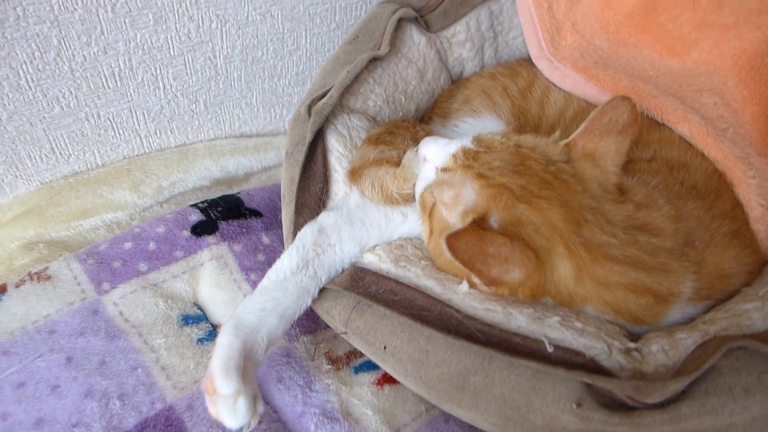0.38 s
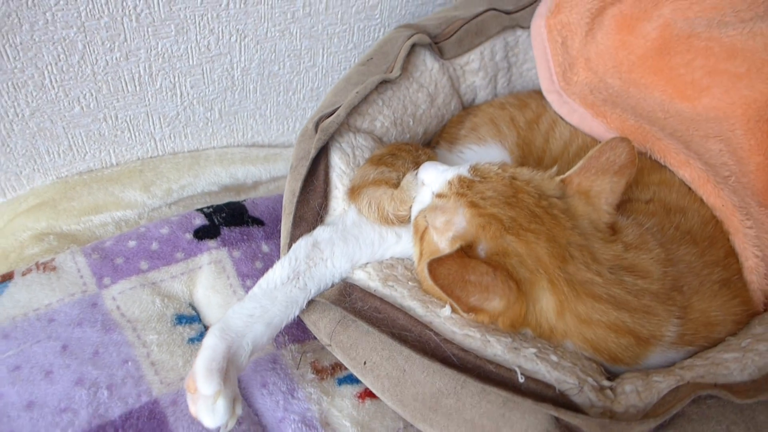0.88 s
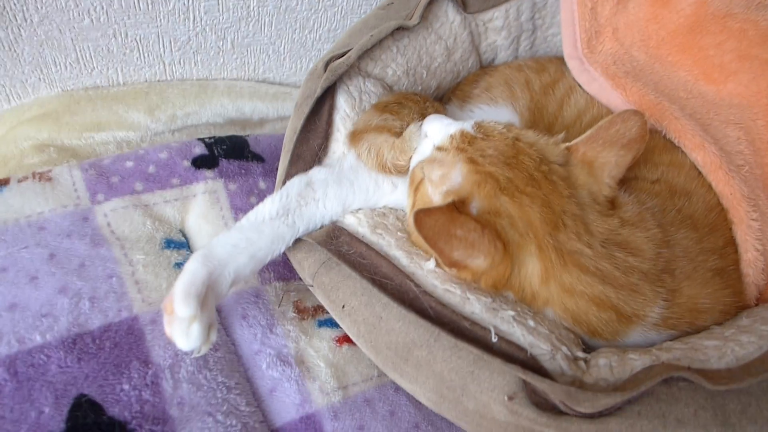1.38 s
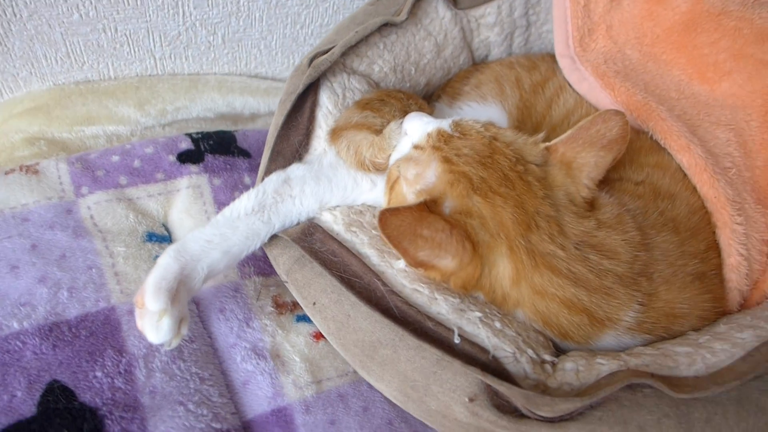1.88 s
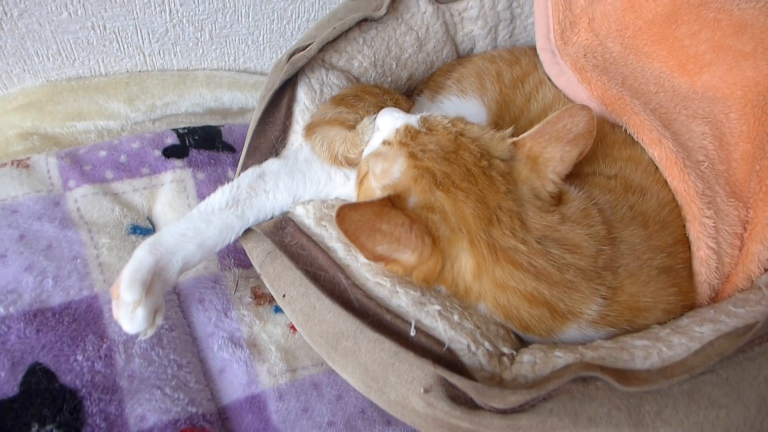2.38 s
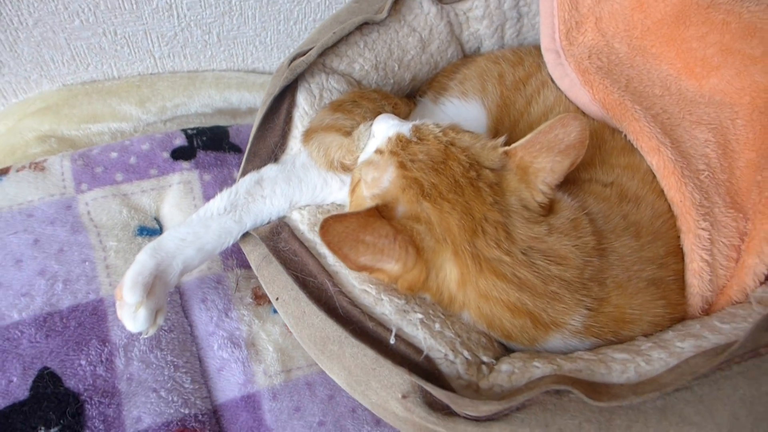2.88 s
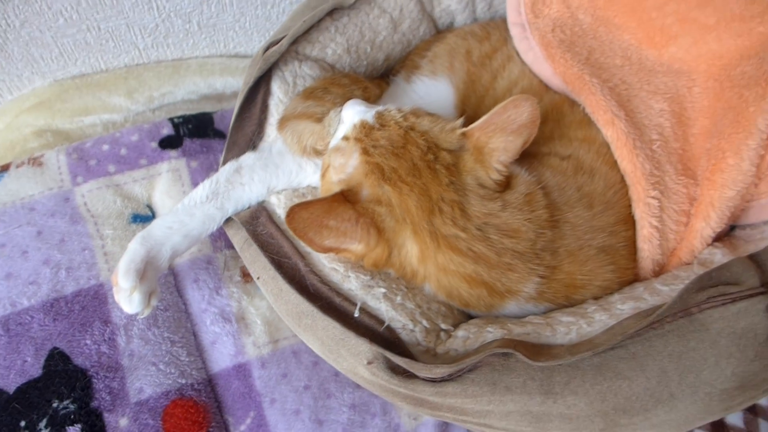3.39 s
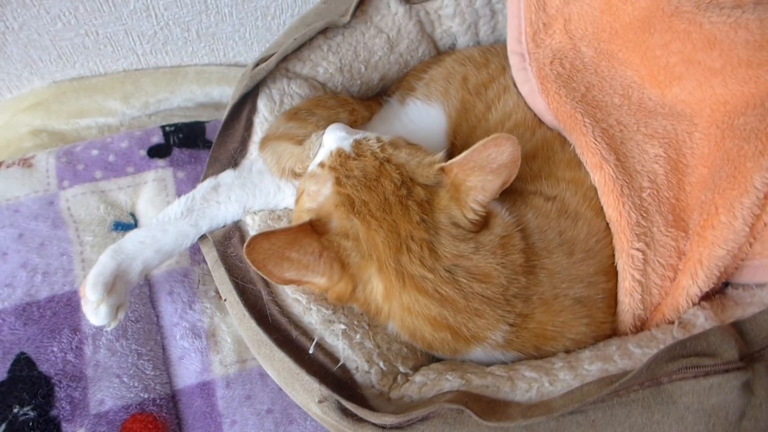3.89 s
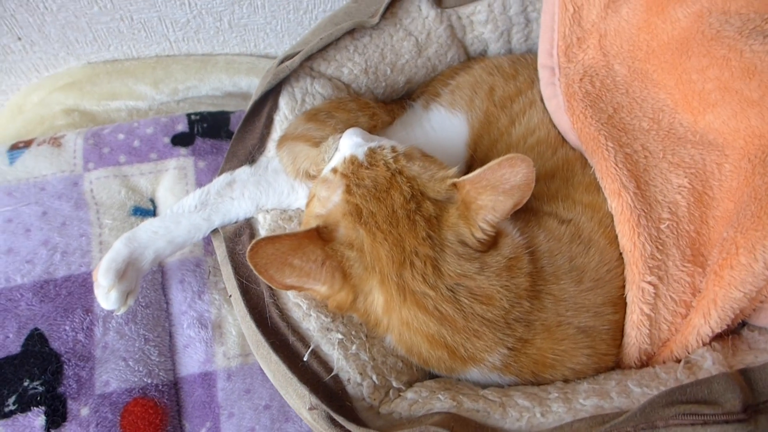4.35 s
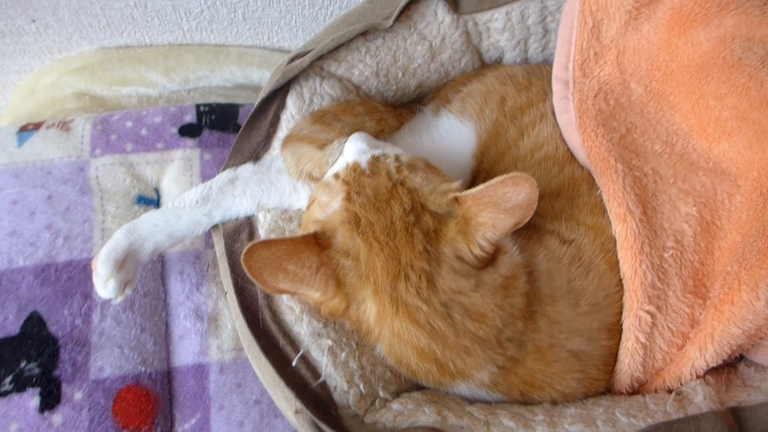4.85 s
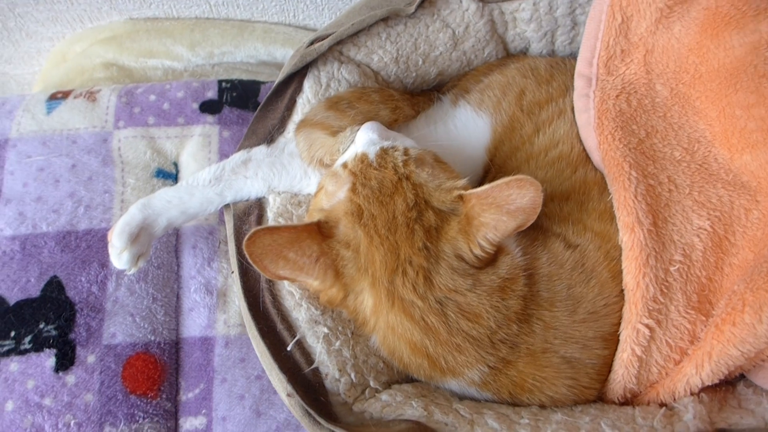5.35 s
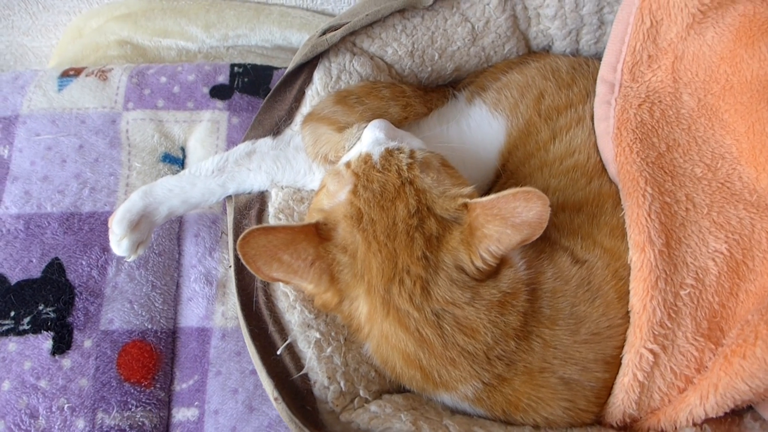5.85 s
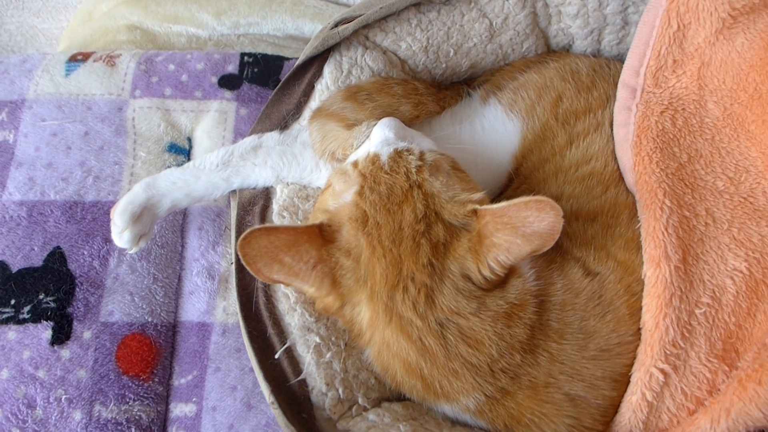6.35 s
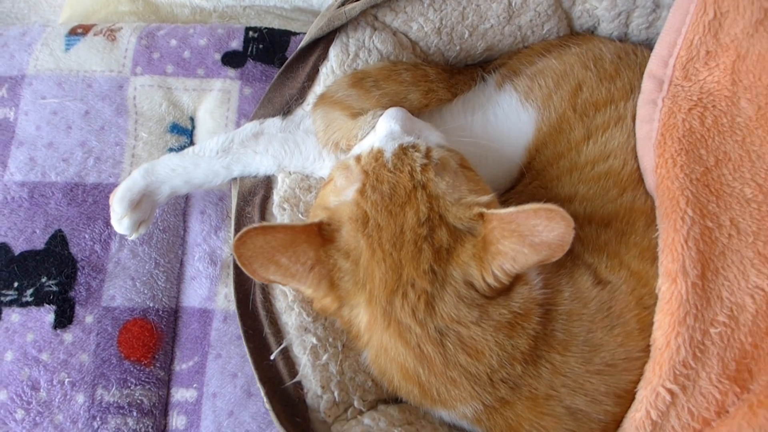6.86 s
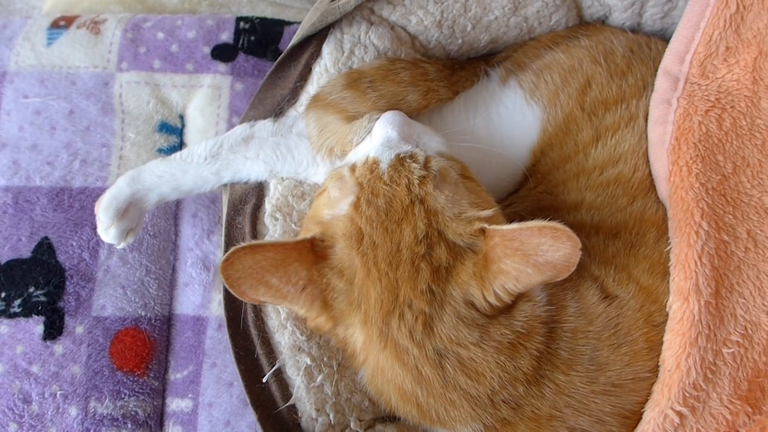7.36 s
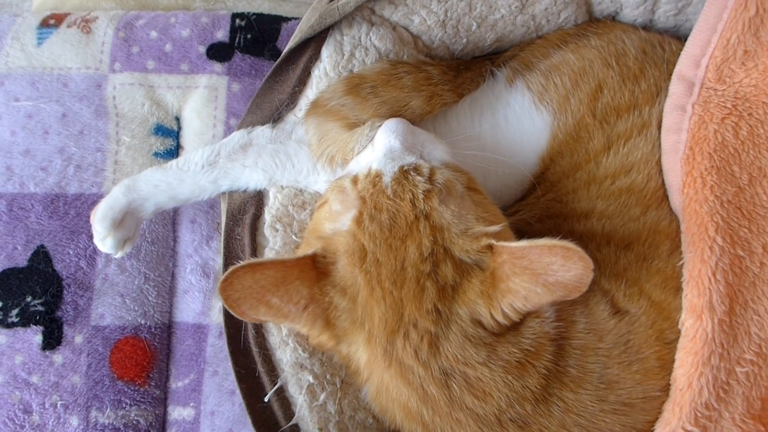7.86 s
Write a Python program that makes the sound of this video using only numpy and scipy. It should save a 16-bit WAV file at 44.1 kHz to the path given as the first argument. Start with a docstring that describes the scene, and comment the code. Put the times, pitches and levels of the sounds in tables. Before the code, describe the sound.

Close stereo pickup from a camera held near a sleeping cat indoors. A coarse, fluttering low burr keeps breaking off and resuming, left-heavy, while dry little mechanical ticks patter rapidly. Skin slides, creaks and light plastic clicks occupy the first seconds; a soft thump falls at 1.3 and two loud snaps near 2.5. Then handling mostly ceases, leaving burr, fine ticking, low hum, room rumble and soft hiss.

```python
"""Dozing cat and a hand-held camera

A cat dozes in its bed under a hand-held camera in a quiet room. Uneven jolts through resonances make a rough purring
burr that starts and stops, its throb mostly at the left microphone port. The lens drive ticks at the picture rate and
whispers between; fingers rub and creak (shaped noise), click (decaying modes) and thump the plastic case.
A wavering hum (gliding sine), faint tones, room rumble and hiss lie underneath."""
import sys
import numpy as np
from scipy import signal
from scipy.fft import rfft, irfft, next_fast_len
from scipy.io import wavfile
from scipy.ndimage import uniform_filter1d, map_coordinates

SR = 44100
rng = np.random.default_rng(int(sys.argv[2]) if len(sys.argv) > 2 else 0)


def magnitude_from_level(level_db):
    """Linear magnitude for a level in decibels (20 dB per decade)."""
    exponent = np.asarray(level_db, float) / 20
    return 10 ** exponent


def master_out(mix):
    """Clip the mix to full scale and print it as 16-bit PCM to the path in sys.argv[1]."""
    frames = np.transpose(np.atleast_2d(mix))
    ceiling = np.clip(frames, -1, 1)
    pcm = np.round(ceiling * 32767).astype(np.int16)
    wavfile.write(sys.argv[1], SR, pcm)


N = 352359


def unit(x):
    """Scales a signal to rms 1."""
    return x / np.sqrt(np.mean(x ** 2) + 1e-20)


def along(points, hz):
    """Reads a curve of (Hz, value) points on a log frequency axis."""
    f, v = np.transpose(points)
    return np.interp(np.log(hz + 1), np.log(f + 1), v)


def curves(rows):
    """Draws one automation curve, sample by sample, for each column after the time."""
    s, *cols = np.transpose(rows)
    return [np.interp(np.arange(N) / SR, s, c) for c in cols]


def wobble(rate):
    """Draws a smooth random curve with rate knots a second."""
    knots = rng.standard_normal(int(N * rate / SR) + 4)
    return map_coordinates(knots, [np.arange(N) * rate / SR])


def tone(hz, phase=0):
    """A sine of rms 1; hz holds one frequency per sample."""
    return np.sqrt(2) * np.sin(2 * np.pi * np.cumsum(hz) / SR + phase)


def filtered(x, response):
    """Filters x by a complex response of frequency."""
    m = next_fast_len(N + SR // 2)
    return irfft(rfft(x, m) * response(np.fft.rfftfreq(m, 1 / SR)), m)[..., :N]


def ring(x, modes):
    """Drives resonances that reach the two ports, each with its own strength and phase."""
    def response(f):
        total = 0
        for k, (centre, width, left_db, right_db, lead) in enumerate(modes):
            resonance = 1j * f * width / (centre * centre - f * f + 1j * f * width)
            ports = np.array([[magnitude_from_level(left_db)], [magnitude_from_level(right_db) * np.exp(-1j * lead)]])
            total = total + (-1) ** k * resonance * ports  # neighbours alternate in sign
        return total
    return filtered(x, response)


def rush(spectrum, alike):
    """Shaped stereo noise of rms 1, with a left-right likeness that depends on frequency."""
    def shape(hz):
        turn = np.arccos(np.clip(along(alike, hz), -1, 1)) / 2
        return magnitude_from_level(along(spectrum, hz)) * [np.cos(turn), np.sin(turn)]
    mid, side = filtered(rng.standard_normal((2, N)), shape)
    return unit(np.array([mid + side, mid - side]))


def chatter(rate, spread_db, noise):
    """Jolts at random moments (rate a second) and of random size, on a bed of noise."""
    sizes = rng.choice([-1, 1], N) * magnitude_from_level(spread_db * rng.standard_normal(N))
    jolts = (rng.random(N) < rate / SR) * sizes
    return unit(jolts) + noise * rng.standard_normal(N)


def spells(start, length, first_db, last_db, rise, fall):
    """Gain of spells that set in at rise dB a second, run from first to last level and die at fall dB a second."""
    since = np.arange(N) / SR - start[:, None]
    over = since - length[:, None]
    progress = np.clip(since / length[:, None], 0, 1)
    held_db = first_db[:, None] + (last_db - first_db)[:, None] * progress
    return magnitude_from_level(held_db + rise * np.minimum(since, 0) - fall * np.maximum(over, 0)).sum(axis=0)


# The hum, wandering in pitch while its level creeps up. Each row: time in seconds, pitch in Hz, level in dB.
HUM_PATH = [(0, 248.3, -57.5), (.62, 249.4, -57), (2.0, 249.1, -56), (3.25, 247.7, -55),
            (4.6, 248.2, -53.8), (7.99, 250.1, -53)]
# Brief bumps and dips of the hum. Each row: centre in seconds, change in dB.
HUM_WAVERS = [(1.33, -7), (1.36, 3), (1.4, 2), (2.13, 3), (2.28, 1.5), (2.39, -8), (2.84, -4), (4.12, -1.5),
              (7.99, -3)]
WAVER_S = .022  # from the centre to 1/e of the change
# Fainter tones. Each row: pitch in Hz, middle level in dB.
FAINT_TONES = [(100, -76.5), (163, -72), (4000, -85)]
# Colour of the room rumble. Each row: frequency in Hz, relative density in dB per Hz.
RUMBLE_COLOUR = [(12, -40), (25, -22.5), (55, -21), (85, -26), (125, -12.5), (200, -5), (270, -8.5),
                 (320, -12), (450, -14), (650, -37), (1100, -120)]
# Colour of the hiss. Each row: frequency in Hz, relative density in dB per Hz.
HISS_COLOUR = [(200, -45), (300, -14.5), (550, -4.5), (900, -9), (1400, -20), (2200, -17.5), (3300, -22),
               (6000, -22), (10000, -26.5), (13300, -30), (15500, -36.5), (15750, -75)]
# Stereo width of rumble and hiss. Each row: frequency in Hz, left-right likeness from 0 to 1.
LIKENESS = [(25, 0.45), (90, 0.67), (200, 0.94), (350, 0.57), (600, 0.097), (5000, 0.031), (9000, 0.58),
            (15000, 0.75)]


def background():
    """A gliding sine hums; faint tones, rumble and hiss swell and sag with it, less deeply."""
    t = np.arange(N) / SR
    hz, db = curves(HUM_PATH)
    for s, change_db in HUM_WAVERS:
        db = db + change_db * np.exp(-((t - s) / WAVER_S) ** 2)
    hum = magnitude_from_level(db) * tone(hz) * magnitude_from_level([[.3], [-.3]])  # slightly to the left
    sway = magnitude_from_level(db - np.mean(db))
    bed = magnitude_from_level(-60.0) * rush(RUMBLE_COLOUR, LIKENESS)
    for f, level_db in FAINT_TONES:
        bed = bed + magnitude_from_level(level_db + 1.5 * wobble(4.6)) * tone(np.full(N, f), 0.35 * wobble(5))
    hiss = magnitude_from_level(-57.5) * rush(HISS_COLOUR, LIKENESS)
    return hum + sway ** 0.43 * bed + sway ** 0.33 * hiss


# Bouts of the burr. Each row: start in seconds, length in seconds, push in dB at the start, push in dB at the end.
BURR_BOUTS = [(0, 0.071, -23.5, -34), (0.134, 0.26, -28.5, -32.5), (0.528, 0.47, -28, -25),
              (1.065, 0.19, -33, -30), (1.47, 0.21, -29, -27.5), (1.736, 0.72, -27, -27.5),
              (2.554, 0.16, -29, -30), (2.78, 0.06, -30, -21.5), (2.984, 0.36, -28.5, -30.5),
              (3.435, 0.56, -25.5, -28), (4.066, .18, -27, -29.5), (4.297, 0.71, -26, -27.5),
              (5.17, 0.084, -27, -35), (5.327, 0.36, -28.5, -27.5), (5.755, 0.24, -22, -41),
              (6, 0.046, -24.5, -36), (6.102, 0.26, -28.5, -26), (6.424, 0.33, -29.5, -29),
              (6.82, 0.32, -32.5, -32.5), (7.222, 0.1, -25.5, -31), (7.385, 0.33, -31.5, -29),
              (7.805, .19, -33, -27.5)]
BOUT_RISE_DB_PER_S, BOUT_FALL_DB_PER_S = 394, 600
IDLE_DB = -48.5  # push left between bouts
STUTTER_DB, FLUTTER_DB = .7, 1.1  # random unevenness, slow and quick
WHIRR_DB, WHIRR_DRIFT_DB = -42, 1  # middle push, slow drift of its own
WHIRR_FOLLOWS, WHIRR_SMOOTH_S = 0.42, 0.13  # share of the bouts' swing, and the span that smooths it
# Strongest jolts of the throb. Each row: time in seconds, push in dB.
THROB_JOLTS = [(.556, -6), (.813, -2), (.892, 1.5), (1.475, -5), (1.582, -1), (1.74, -11), (2.02, -6),
               (2.171, 0.5), (2.286, 2.5), (2.382, 0), (3.327, -4.5), (3.46, -7), (3.939, 3), (4.063, -6),
               (4.133, -14), (4.376, -7), (4.484, -1), (4.765, -10), (4.969, 2), (5.36, -3), (5.553, -1),
               (5.76, -8), (5.859, 0.5), (6.001, -10), (6.101, 4.5), (6.185, 0), (6.219, 2.5), (7.034, -1),
               (7.222, -5), (7.381, -6), (7.928, -2)]
# Short flares of the whirr. Each row: time in seconds, push in dB.
WHIRR_FLARES = [(2.8393, -16), (3.2887, -13), (3.3262, -16.5), (5.169, -25), (5.7056, -14.5), (5.9342, -17),
                (6.626, -14), (6.865, -11.5), (7.134, -12.5), (7.268, -16), (7.8359, -15.5)]
# Resonances of the low throb. Each row: centre in Hz, width in Hz, left in dB, right in dB, lead of the left in rad.
THROB_MODES = [(460.4, 68, -8, -30, 0.5), (522, 57, 1.5, -20.5, 0.75), (564.6, 73.4, 2, -17.5, 1.59),
               (636.4, 69, 0, -20, 1.85), (705, 112, -4, -16, 1.52), (780.5, 68, -4.5, -14, 2.65),
               (902, 48, -12, -18.5, 2.44)]
# Resonances of the higher whirr. Each row: centre in Hz, width in Hz, left in dB, right in dB, lead of the left in rad.
WHIRR_MODES = [(1116, 160, -7.5, -3.5, 1.86), (1163, 69, 4.5, 2.5, 2.38), (1330, 166, -0.5, 0.5, 1.89),
               (1533, 430, -5, -3.5, 2.29), (1880, 136, -6.5, -9, 1.9)]


def burr():
    """Uneven jolts, carried through the case, ring a low throb and a higher whirr."""
    effort = spells(*np.transpose(BURR_BOUTS), BOUT_RISE_DB_PER_S, BOUT_FALL_DB_PER_S) + magnitude_from_level(IDLE_DB)
    unevenness = magnitude_from_level(STUTTER_DB * wobble(13) + FLUTTER_DB * wobble(30))
    throb = effort * unevenness * chatter(rate=330, spread_db=2.0, noise=0.72)
    smooth = uniform_filter1d(effort, size=round(WHIRR_SMOOTH_S * SR)) / effort.mean()
    whirr_level = smooth ** WHIRR_FOLLOWS * magnitude_from_level(WHIRR_DB + WHIRR_DRIFT_DB * wobble(2.07) + 1.93 * wobble(15))
    whirr = whirr_level * chatter(rate=500, spread_db=4, noise=0.68)
    for s, db in THROB_JOLTS:  # a push, and a second one a cycle of the main resonance later
        throb[round(s * SR) + np.array([0, 79])] += magnitude_from_level(db)
    for s, db in WHIRR_FLARES:  # four pushes at about 1260 Hz, amid the whirr's resonances
        whirr[round(s * SR) + np.array([0, 35, 70, 105])] += magnitude_from_level(db)
    return ring(throb, THROB_MODES) + ring(whirr, WHIRR_MODES)


PICTURE_HZ, STEP_PHASE = 60 / 1.001, .47  # steps a second; first step as a fraction of a picture
# How hard the lens drive works. Each row: time in seconds, base level of a step in dB.
DRIVE_LEVEL = [(0, -24.5), (.25, -31.5), (.95, -30), (1.13, -28.5), (1.4, -31), (2.45, -30), (2.83, -32),
               (3.7, -29), (5.2, -30), (6.1, -33.5), (6.6, -35.5), (6.85, -31.5), (7.99, -30.5)]
# Its loudest ticks. Each row: time in seconds, strength of the tap in dB.
LOUD_TICKS = [(.3247, -17), (0.4253, -15), (0.4603, -16), (.4755, -17), (0.9093, -14), (0.959, -10),
              (1.059, -9), (1.4426, -15), (1.4604, -14), (1.493, -14.5), (1.8937, -15.5), (2.644, -10.5),
              (2.6609, -10), (2.761, -1), (2.9958, -10.5), (3.0949, -13.5), (3.531, 1), (4.011, -10),
              (4.362, -2.5), (4.5785, -13), (4.912, -15), (4.9626, -14.5), (4.9796, -12), (5.2643, -10.5),
              (5.3632, -14), (5.3798, -13), (5.7633, -5.5), (5.7988, -7.5), (6.8664, -5.5), (7.8005, -10.5),
              (7.8486, -11), (7.8665, -12)]
# Resonances of the lens barrel. Each row: centre in Hz, width in Hz, left in dB, right in dB, lead of the left in rad.
BARREL_MODES = [(3644, 320, -14, -10, 1.05), (4052, 106, -3, -0.5, 1.04), (4640, 310, -7.5, -5, 1.6),
                (5340, 700, -17.5, -26, 0.48)]
# Whistle of the gears. Each row: centre in Hz, width in Hz, left in dB, right in dB, lead of the left in rad.
GEAR_MODES = [(2600, 68, 0, 0, 1.1)]


def lens():
    """Each step of the drive, one a picture, taps the barrel; its gears whisper and whistle between."""
    level = magnitude_from_level(curves(DRIVE_LEVEL)[0])
    pictures = np.arange(int(N / SR * PICTURE_HZ))
    steps = np.round((pictures + STEP_PHASE) / PICTURE_HZ * SR).astype(int)
    taps = np.zeros(N)
    taps[steps] = level[steps] * magnitude_from_level(12.0 * np.minimum(rng.standard_normal(len(steps)), 1.3))
    for s, db in LOUD_TICKS:
        taps[round(s * SR)] = magnitude_from_level(db)
    whisper = level * magnitude_from_level(-17 + 2.15 * wobble(22)) * chatter(rate=900, spread_db=7.0, noise=0.54)
    flutter_db = 3.5 * wobble(12)
    whistle = level * magnitude_from_level(-21.0 + flutter_db) * rng.standard_normal(N)
    return ring(taps + whisper, BARREL_MODES) + ring(whistle + .2 * taps, GEAR_MODES)


# Fingers sliding on the case. Each row: start in seconds, length in seconds, middle hiss in dB, middle creak in dB.
FINGER_SLIDES = [(0, 0.13, -54.5, -59), (0.166, 0.078, -57, -61), (0.76, 0.025, -63, -60),
                 (0.981, 0.0091, -65, -55), (1.023, 0.093, -70, -63), (1.165, 0.019, -55.5, -55.5),
                 (1.204, 0.01, -60, -59), (1.256, 0.028, -50, -55), (1.33, .9, -71.5, -71),
                 (2.246, .02, -62, -64), (2.3, .05, -70, -67), (2.373, 0.024, -51, -58),
                 (2.446, 0.01, -56, -50.5), (2.509, .012, -57, -49), (2.516, 0.013, -57, -49.5),
                 (2.574, 0.33, -70, -67.5), (3.532, 0.02, -72, -55.5), (6.634, 0.046, -71, -61.5)]
TOUCH_DB_PER_S, LIFT_DB_PER_S = 466, 603  # how fast a touch comes and goes
# Colour of the rubbing hiss. Each row: frequency in Hz, relative density in dB per Hz.
RUB_COLOUR = [(2470, -17), (4200, -8), (4420, -24), (4770, -9.5), (5500, -4.5), (5960, -10), (6740, -12),
              (8220, -16.5), (13000, -30.5)]
# Colour of the creak. Each row: frequency in Hz, relative density in dB per Hz.
CREAK_COLOUR = [(900, -32), (1400, -3.5), (2100, 4), (2900, 1.5), (3500, -7.5), (4200, -24), (5000, -60)]
# Shifts of the grip. Each row: start in seconds, length in seconds, middle thump in dB.
GRIP_SHIFTS = [(1.256, 0.027, -39.5), (2.38, 0.021, -50), (2.458, 0.013, -42.5), (6.636, .035, -54.5)]
JOLT_DB_PER_S, SETTLE_DB_PER_S = 2500, 500  # a shift starts sharply and settles
# Colour of the thump. Each row: frequency in Hz, relative density in dB per Hz.
THUMP_COLOUR = [(60, -60), (110, -23), (200, -2), (300, -10), (420, 0), (725, -13.5), (1300, -14),
                (2500, -35), (3250, -54), (5500, -120)]


def fingers():
    """Skin hisses and creaks on the plastic; a shifted grip thumps the body."""
    start, length, rub_db, creak_db = np.transpose(FINGER_SLIDES)
    rub_touch = spells(start, length, rub_db, rub_db, TOUCH_DB_PER_S, LIFT_DB_PER_S)
    rub = rub_touch * magnitude_from_level(2.2 * wobble(140)) * rush(RUB_COLOUR, [(4000, 0.33), (9000, 0.3)])
    creak_touch = spells(start, length, creak_db, creak_db, TOUCH_DB_PER_S, LIFT_DB_PER_S)
    grain_db = 2.8 * wobble(200)
    creak = creak_touch * magnitude_from_level(grain_db) * rush(CREAK_COLOUR, [(1000, 0.27), (3000, 0.52)])
    at, held, thump_db = np.transpose(GRIP_SHIFTS)
    shift = spells(at, held, thump_db, thump_db, JOLT_DB_PER_S, SETTLE_DB_PER_S)
    thump = shift * magnitude_from_level(0.9 * wobble(60)) * rush(THUMP_COLOUR, [(100, 0.75), (1000, 0.18)])
    return rub + creak + thump


# Clicks of the case. Each row: start in seconds, level in dB, most strongly rung pitch in Hz,
# fall-off away from it in dB per octave, left over right in dB.
CASE_CLICKS = [(0.3574, -37.5, 4170, 5, -4), (.7497, -38.5, 3800, 10, 1), (.7667, -41, 2500, 9, -1),
               (.9812, -36.5, 3220, 10, .6), (1.0745, -42, 3300, 11, 2.2), (1.1044, -26.5, 4130, 10.5, 2.5),
               (1.2002, -26.5, 2860, 20, 1.5), (1.2167, -35, 3000, 9, -1.5), (1.6375, -42, 8040, 13, 1),
               (2.2475, -29, 9000, 11.5, -3), (2.2534, -46, 4500, 1, -1.2), (2.4516, -11, 4700, 5.5, 3.5),
               (2.5148, -11, 5370, 9.5, -1), (2.5261, -13.5, 5000, 6, 5), (3.4336, -42, 1500, 4, -1),
               (3.5304, -34, 4600, 17, 3), (3.5444, -40, 3500, 8, 0.1), (6.865, -47, 4000, 8, 0)]
STEEPER_ABOVE = 1.18  # factor on the fall-off towards the treble
REBOUND_S, REBOUND_DB = .0036, -10.5  # delay and level of the rebound
# Modes of the plastic case, in six groups from thud to top. Each row: pitch in Hz, level in dB,
# 60 dB decay time in seconds, left over right in dB, lead of the left in rad.
CASE_MODES = [
    [(406, -2.5, 0.09, 1, .2), (563.6, -3.5, 0.035, 15, 0.96)],
    [(710, 3.5, 0.019, 15, 1.5), (1090, -1, 0.026, 0.5, 1.8), (1470, -10, 0.013, 20, 2.2)],
    [(1635.6, -2.5, .018, 0, 1.54), (2106, 3.5, 0.016, 1.5, 1.2)],
    [(2550, 2.5, 0.0093, -6, .6), (2945, -0.5, 0.015, -2, 0.56), (3527, -2, 0.01, -3, 0.53)],
    [(4160, -6, 0.0084, -1, 0.94), (5010, 7, 0.0056, -11, 1.84), (5670, 2, 0.011, 2, 1.35)],
    [(6540, 4, 0.0054, -7, 0.94), (7550, -3.5, 0.0081, 9, 1.5), (8600, -3.5, 0.0067, -3, 1),
     (9840, -4.5, 0.0062, 2, 1), (11030, -2.5, 0.004, 4, 1), (12700, -7, 0.005, 3, 1.3),
     (14200, -16, .003, 2.5, 1.35)],
]


def clicks():
    """Each click rings the case's modes most around its own pitch; low modes build up later, and the catch rebounds."""
    out, t = np.zeros((2, N + SR)), np.arange(SR // 10) / SR
    side = np.array([[.5], [-.5]])  # left, right
    hz, level_db, t60, left_db, lead = np.concatenate(CASE_MODES).T[..., None]
    build_up = 1 - np.exp(-(t / (0.00049 + 0.82 / hz)) ** 4.1)
    decay = magnitude_from_level(level_db - 60 * t / t60) * build_up
    for s, db, centre_hz, slope_db, pan_db in CASE_CLICKS:
        size, phase = rng.standard_normal((2, len(hz), 1))
        octaves = np.abs(np.log2(hz / centre_hz)) * np.where(hz > centre_hz, STEEPER_ABOVE, 1)
        strength = magnitude_from_level(-slope_db * octaves + 0.39 * size) * decay
        sound = np.array([np.sum(strength * magnitude_from_level(port * left_db)
                                 * np.sin(2 * np.pi * hz * t + 0.62 * phase + port * lead), axis=0)
                          for port in side])
        sound = magnitude_from_level(db + side * pan_db) * sound
        out[:, round(s * SR):][:, :len(t)] += sound
        rebound = magnitude_from_level(REBOUND_DB) * uniform_filter1d(sound, size=4)  # duller
        out[:, round((s + REBOUND_S) * SR):][:, :len(t)] += rebound
    return out[:, :N]


def scene():
    """Sums everything that reaches the two ports."""
    return background() + burr() + lens() + fingers() + clicks()


def low_pass(x):
    """Removes everything above the highest recorded frequency."""
    return signal.sosfilt(signal.butter(12, 16450, fs=SR, output="sos"), x)


def record(dry):
    """The camera takes the two ports as they are."""
    return low_pass(dry)


dry = scene()
out = record(dry)
master_out(out)
```